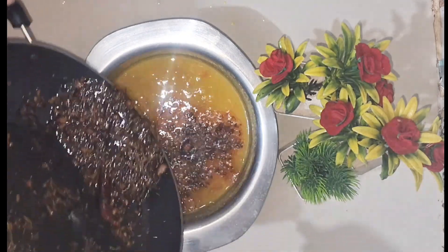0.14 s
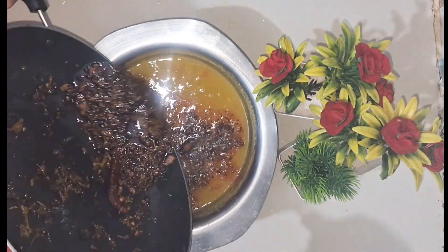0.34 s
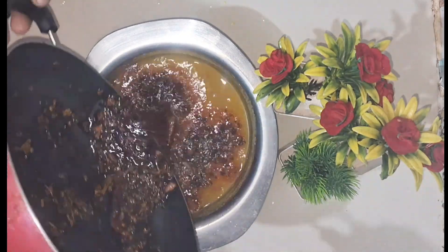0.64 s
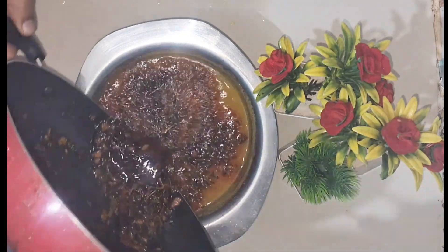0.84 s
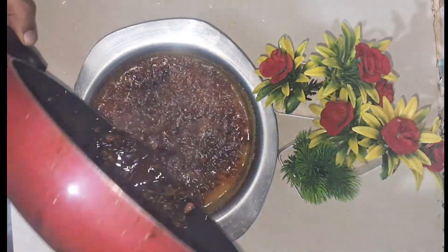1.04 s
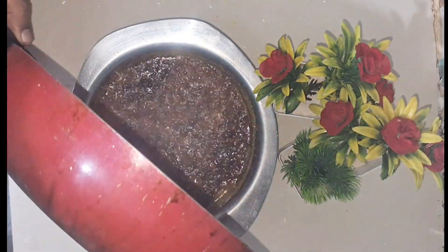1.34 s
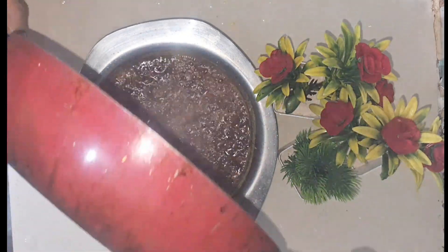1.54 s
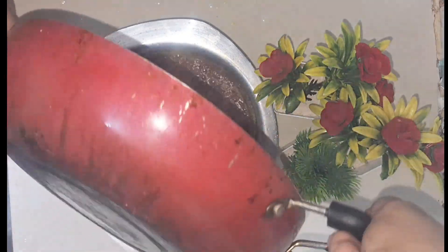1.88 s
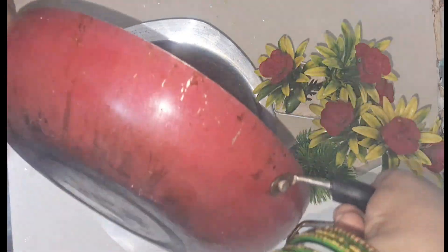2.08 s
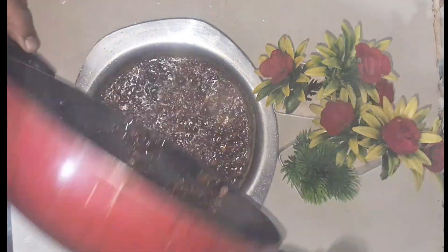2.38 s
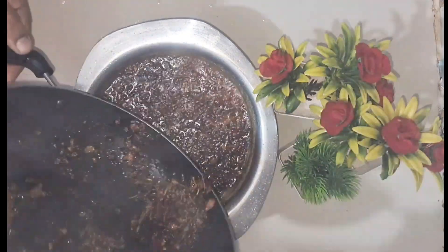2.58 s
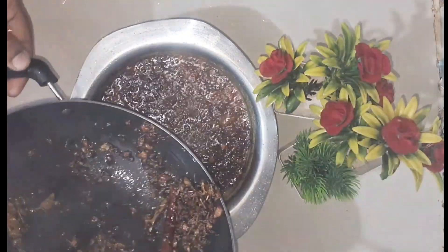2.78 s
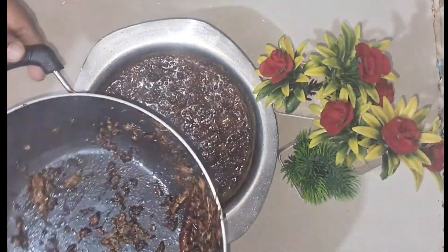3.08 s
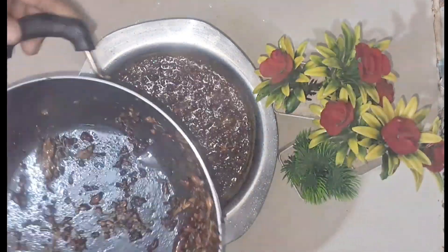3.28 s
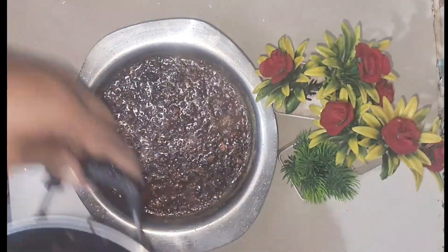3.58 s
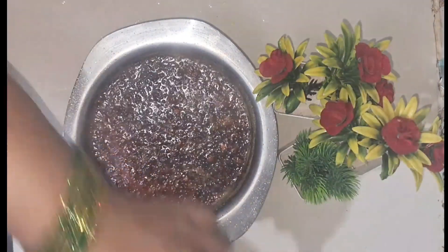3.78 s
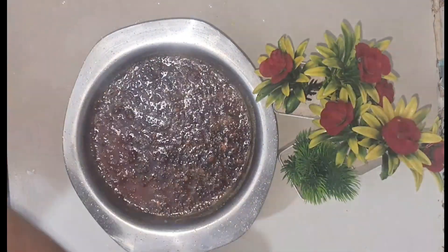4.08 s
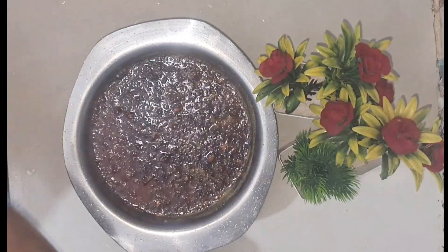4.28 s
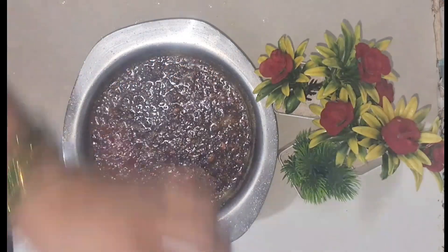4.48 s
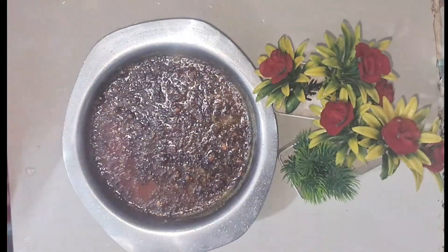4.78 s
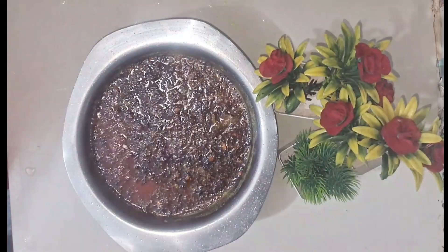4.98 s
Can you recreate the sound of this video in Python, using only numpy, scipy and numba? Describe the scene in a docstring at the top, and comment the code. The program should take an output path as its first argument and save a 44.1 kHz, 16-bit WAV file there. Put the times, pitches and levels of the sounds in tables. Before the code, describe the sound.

Hot spiced oil glugs into a steel bowl of wet lentils, erupting in a loud crackling sizzle that fades, then flares after a bump.

```python
"""Small kitchen: hot spiced oil is tipped from a pan into a steel bowl of cooked lentils; a motor hums over low rumble.
Water flashes to steam: swarms of decaying sines make big bubbles, crackle and fizz, fading as the oil cools.
Glugs, gurgles and slurps are pitched bubbles; spits are short resonant noise bursts.
The pan bumps the bowl; later a hand shifts it on the counter: modes ring, filtered noise scrapes, the sizzle flares."""
import sys
import numpy as np
from scipy import signal
from scipy.fft import rfft, irfft, next_fast_len
from scipy.io import wavfile
from scipy.ndimage import uniform_filter1d
from numba import njit

SR = 44100
rng = np.random.default_rng(int(sys.argv[2]) if len(sys.argv) > 2 else 0)


def int16_out(signal):
    """Quantize to a 16-bit WAV file."""
    q = np.round(np.clip(np.atleast_2d(signal).T, -1, 1) * 32767)
    wavfile.write(sys.argv[1], SR, q.astype(np.int16))


N = 226507
TIME = np.arange(N) / SR
FREQS = np.fft.rfftfreq(2 * next_fast_len(N // 2 + 8192), 1 / SR) + 1e-3  # offset keeps log finite

# Low rumble of the kitchen. Each row: frequency in Hz, relative density in dB per Hz.
RUMBLE_HZ_DB = [(25, -26), (48, -13), (65, -3.5), (88, -9), (130, 6), (160, -5), (190, -1.5), (290, 1),
                (340, -12.5), (410, -3.5), (520, -12.5), (850, -9.5), (1300, -22), (3000, -70)]
# Motor hum. Each row: frequency in Hz, mean level in dB rms.
HUM_HZ_DB = [(64.6, -53.5), (107.7, -51.5), (193.8, -51), (236.9, -54), (279.9, -56.5), (301.5, -58.5)]
# Modes of the bowl on the counter. Each row: frequency in Hz, relative level in dB, undamped t60 in s.
COUNTER_MODES = [(66.1, -14, 1.4), (110, -15, 0.33), (137.4, -5.5, 0.25), (191.7, -3, 0.23),
                 (230, -8.5, 1.24), (276.3, 0, 0.36), (400.3, -1.5, 0.2), (507, -1.5, 0.12)]
# Shudder of the counter after the push. Each row: time in s, level in dB.
SHUDDER_S_DB = [(4.15, -90), (4.27, -34), (4.46, -39), (4.68, -35.5), (4.8, -53), (5.14, -34)]
# Bumps of the bowl. Each row: start in s, thud in dB, contact time in s, ring in dB, ring pitch in Hz,
# scrape in dB, share of ring time that pan or hand leave.
BUMP_EVENTS = [(0.198, -16, 0.0023, -15, 912, -17, 0.55), (0.222, -20, 0.0023, -13, 903, -25, 0.73),
               (4.159, -15.5, 0.0034, -27, 770, -18, 0.79), (4.184, -19, 0.0013, -20, 670, -12, 0.3),
               (4.202, -14, 0.0048, -13.5, 838, -24, 0.33), (4.234, -19, 0.0033, -27, 833, -20, 0.31),
               (4.495, -30, 0.0014, -20, 903, -29, 0.26), (4.502, -19, 0.002, -22.5, 401, -27, 0.44),
               (4.5221, -16, 0.0019, -24.5, 404, -13, 0.34), (4.544, -32, 0.0018, -24, 900, -33, 0.27)]
# Partials of the struck bowl. Each row: multiple of the ring pitch, relative level in dB, undamped t60 in s.
CLANK_PARTIALS = [(0.998, -0.5, 0.37), (1.24, -12, .16), (1.39, -14, .13), (1.84, -5, 0.18)]
# Spits: a pocket of water bursts at once. Each row: start in s, level in dB, centre in Hz,
# width of each of two filter passes in Hz, fade time constant in s.
SPIT_EVENTS = [(0.05, -27.5, 4000, 2500, 0.041), (1.16, -17, 3560, 1800, .035),
               (1.235, -17, 2570, 1400, 0.053), (1.649, -17, 3060, 2200, 0.039),
               (1.72, -17, 3000, 2200, 0.049), (1.89, -19.5, 3970, 2500, 0.037),
               (2.779, -23, 2850, 2400, 0.026), (2.905, -22.5, 4000, 1700, 0.04),
               (3.02, -26.5, 3880, 1600, 0.039), (3.235, -25.5, 2730, 450, 0.037),
               (3.34, -33, 3700, 1300, 0.041), (3.452, -25.5, 3180, 1900, 0.056),
               (4.055, -26.5, 4000, 1800, .022), (4.392, -24, 3570, 3560, 0.042),
               (4.699, -15, 5000, 4500, 0.016), (4.791, -33, 3800, 4540, 0.02),
               (4.878, -24, 8000, 8000, .014), (4.971, -16.5, 5000, 8050, 0.025),
               (5.056, -20, 3050, 3400, 0.049), (5.122, -19.5, 4500, 7000, 0.027)]
# Slurps: quick bubble runs that glide in pitch. Each row: start in s, length in s, level in dB,
# first pitch in Hz, last pitch in Hz, pitch scatter as a share.
SLURP_EVENTS = [(0, 0.081, -26.5, 1610, 2150, 0.073), (.68, .18, -34.5, 1260, 1160, 0.04),
                (.93, 0.2, -31, 1090, 1170, 0.05), (2.06, .075, -28, 1980, 2140, 0.049)]
# Gurgling under the oil stream. Each row: time in s, level in dB, pitch in Hz, pitch scatter as a share.
GURGLE_COURSE = [(0, -31, 1540, 0.045), (.4, -29.5, 1493, .03), (.58, -30, 1487, .035),
                 (.7, -25, 1497, .045), (.85, -34.5, 1544, 0.032), (1.03, -30.5, 1525, .025),
                 (1.3, -37, 1540, .02), (1.6, -29, 1530, 0.0082), (1.75, -41, 1540, .014),
                 (1.86, -36, 1524, 0.01), (1.97, -31, 1522, 0.012), (2.08, -45, 1530, .014),
                 (2.28, -41, 1503, .012), (2.55, -39, 1505, 0.023), (2.8, -62, 1525, .02)]
# Glugs that stand out. Each row: start in s, level in dB, initial pitch in Hz.
GLUG_EVENTS = [(.033, -10.5, 1590), (.232, -13.5, 1490), (.246, -8, 1780), (.271, -8, 2010),
               (.286, -9, 2120), (.356, -17.5, 1480), (.384, -15, 1500), (.411, -15, 1450),
               (.441, -12, 1430), (.568, -10, 1500), (.630, -11, 1490), (.653, -8, 1450), (.681, -10, 1440),
               (.701, -6.5, 1260), (.725, -6, 1200), (.727, -12, 1514), (.742, -6.5, 1520),
               (.750, -14, 1260), (.770, -10, 1270), (.847, -15, 1530), (.897, -17, 1500),
               (.937, -12, 1480), (.977, -9.5, 1525), (1.008, -11, 1560), (1.029, -12.5, 1480),
               (1.048, -11, 1460), (1.068, -12, 1500), (1.135, -17, 1456), (1.165, -19, 1300),
               (1.230, -9.5, 1465), (2.099, -14, 1990)]
# Hot oil meets wet lentils: first spill, stream starts, main pour, bowl shifted. Each row: start in s,
# strength in dB, rise in s, hold in s, reference delay in s (each bubble size takes its own share).
FLARE_EVENTS = [(-0.2, -2, 0.15, 0.22, -0.03), (0.516, -5, 0.23, 0.091, -0.0047),
                (0.608, -0.08, 0.21, 0.96, 0.06), (4.147, -5.5, 0.41, 0.041, -0.036)]
# Answer of each bubble size to a flare. Columns: level in dB, response in dB per dB of strength,
# share of the delay, sag in the hold in dB per s, cooling in dB per s, lasting simmer in dB, unevenness in dB.
BIG_ANSWER = (-19.5, 1.63, 0.3, 5, 8.5, -58, -1.5)
CRACKLE_ANSWER = (-18, 0.55, 1.27, -2, 9, -40.5, 1.5)
FIZZ_ANSWER = (-19, 1.08, 2, 1.4, 8, -31.5, 0.6)
# Colour of the sizzle. Each row: frequency in Hz, relative density in dB per Hz.
SIZZLE_HZ_DB = [(200, -6), (420, -49), (560, -9.5), (800, -7.5), (1150, -1.5), (1500, 1), (2100, 0.5),
                (2800, 4.5), (3800, -2), (5300, -2.5), (7000, -8), (9500, -6), (12700, -6), (15700, -9.5)]
# Air and wall resonances of the bowl. Each row: centre in Hz, width in Hz, lift in dB.
BOWL_RESONANCES = [(832, 9.2, 13.5), (930, 22, -0.5), (1028, 35, 14.5), (1116, 22, 10), (1188, 14, 9),
                   (1223, 11.5, 9.5), (1282, 34, 6), (1506, 31, 5), (1730, 17, 7), (1850, 18, 7.5),
                   (1915, 18, 6.5), (2010, 28, 5.5), (2460, 60, 4.5), (2666, 32, 6), (2930, 29, 4),
                   (3350, 68, 5), (3783, 560, 6)]
# Middle band of the sizzle over time. Each row: time in s, gain in dB.
MIDDLE_S_DB = [(2.1, -4), (2.6, -2.5), (2.95, -5.5), (3.4, -4), (3.7, -3.5), (4.2, 0)]
# Colour after the shift, when the oil boils at a new spot. Each row: frequency in Hz, gain in dB.
SHIFTED_HZ_DB = [(250, 11.5), (420, 7.5), (650, 4.5), (900, -1.5), (1150, -8.5), (1550, 0), (2000, -3.5),
                 (2550, -1.5), (3150, -5), (3800, -2.5), (4800, -1.5), (7000, 1), (15000, 1.5)]
# Difference of the two microphone ports. Each row: frequency in Hz, left minus right in dB.
PORTS_HZ_DB = [(60, 0), (200, -4.5), (380, -3.5), (640, -1), (1290, 4.5), (2400, 0.5), (3800, 0),
               (5200, 1.5), (5900, 0.5), (6700, 2), (8200, 0), (10000, 1), (12000, 3), (15000, 5.5)]
# Delay between the ports. Columns: least in s, spread over the bowl in s.
PORT_DELAY_S = (.00124, .00026)

RUMBLE_DB = -41.5
ROOM_T60_S = 0.18
SPIT_ATTACK_S = 0.004
GURGLE_CYCLES, GURGLE_SURGE_DB = 93, 2.5
GLUG_T60_S, GLUG_ATTACK_S = 0.028, 0.00083
GLUG_SPLASH_DB, GLUG_SPLASH_S = -15, 0.0036
PING_DB, CHURN_DB = -10.5, -21  # against crackle and big bubbles
SHIFT_S, SHIFT_FADE_S = 4.26, 0.082
TOP_HZ = 15800


def undb(db):
    """Decibels to gain."""
    return 10 ** (np.asarray(db) / 20)


def unit(x):
    """Scale to rms 1."""
    return x / np.sqrt(np.mean(x ** 2))


def spectrum(x):
    """Zero-padded spectrum on FREQS."""
    return rfft(x, 2 * (len(FREQS) - 1))


def shape(x, gain):
    """Filter by a gain given on FREQS."""
    return irfft(spectrum(x) * gain)[..., :N]


def colour(points):
    """Gain on FREQS through (Hz, dB) points, linear in dB over log frequency."""
    hz, db = np.transpose(points)
    return undb(np.interp(np.log(FREQS), np.log(hz), db))


def band(lo_hz, hi_hz, order=6):
    """Band-pass gain on FREQS; neighbours add up to even power."""
    return 1 / np.sqrt((1 + (lo_hz / FREQS) ** (2 * order)) * (1 + (FREQS / hi_hz) ** (2 * order)))


def walk(rate_hz):
    """Random levels held 1 / rate_hz seconds and slewed twice."""
    k = int(SR / rate_hz)
    held = rng.standard_normal(N)[np.arange(N) // k]
    return 0.41 * uniform_filter1d(uniform_filter1d(held, k), k)


def ring(t, hz, t60_s):
    """A struck mode: sine with exponential decay."""
    return np.sin(2 * np.pi * hz * t) * np.exp(-np.log(1000) * t / t60_s)


def add(out, s, x):
    """Mix x into out from time s."""
    i = max(int(s * SR), 0)
    out[i:i + len(x)] += x[:max(N - i, 0)]


@njit
def pops(start, hz, cycles, size):
    """Each bursting bubble is a sine that falls 60 dB over its cycles; start is in samples."""
    out = np.zeros(N)
    for k in range(len(start)):
        length = cycles[k] * SR / hz[k]
        z = size[k] + 0j
        p = np.exp(2j * np.pi * hz[k] / SR - np.log(1000) / length)
        for i in range(int(start[k]), min(N, int(start[k] + length) + 2)):
            out[i] += z.imag
            z *= p
    return out


def kitchen(x, wet_db, early_s=0.017):
    """Echoes from bowl, counter and walls: a diffuse wash with the sound's colour that trails its energy."""
    t = TIME[:SR // 3]
    decay = np.exp(-2 * np.log(1000) * t / ROOM_T60_S) + 8 * np.exp(-t / early_s)
    energy = signal.fftconvolve(np.mean(x ** 2, axis=0), decay / decay.sum())[:N]
    random_phase = np.exp(2j * np.pi * rng.random((2, len(FREQS))))
    wash = unit(irfft(np.abs(spectrum(x)) * random_phase)[:, :N])
    return (x + undb(wet_db) * wash * np.sqrt(np.abs(energy))) / np.sqrt(1 + undb(wet_db) ** 2)


def reflections(x, wet_db, lag_s, t60_s):
    """A sound from one spot reaches the left port first; a short train of echoes reaches each port."""
    t = TIME[:SR // 6]
    echo = rng.standard_normal((2, len(t))) * np.exp(-np.log(1000) * t / t60_s) * (t > .002)
    response = undb(wet_db) * unit(echo) / np.sqrt(len(t))
    response[0, 0] += 1
    response[1, int(lag_s * SR)] += 1
    return signal.fftconvolve(x[None], response, axes=1)[:, :N] / np.sqrt(1 + undb(wet_db) ** 2)


def background():
    """A motor's sines waver in level and phase over noise rumble, most alike at both ports near 200 Hz."""
    hum = np.zeros(N)
    for hz, db in HUM_HZ_DB:
        phase = 2 * np.pi * hz * TIME + 3.8 * walk(5.5)
        hum += undb(db + 2 * walk(14.0)) * np.sqrt(2) * np.sin(phase)
    mid, side = shape(rng.standard_normal((2, N)), colour(RUMBLE_HZ_DB))
    side = shape(side, colour([(50, -1), (200, -14.0), (400, -1.0)]))
    return hum + undb(RUMBLE_DB) * unit(mid + side * np.array([[1], [-1]]))


def shudder():
    """Irregular small pushes keep the counter's modes rumbling: noise through its resonances."""
    body = sum(undb(db) / np.hypot(1, (FREQS - hz) / 11) ** 2 for hz, db, _ in COUNTER_MODES)
    rumble = unit(shape(rng.standard_normal(N), body * band(85, 276, order=3)))
    return rumble * undb(np.interp(TIME, *np.transpose(SHUDDER_S_DB)))


def bumps():
    """Each bump thuds through the counter, rings the full bowl and grates its base a little."""
    thuds, rings, grating = np.zeros((3, N))
    t = TIME[:SR]
    for s, thud_db, contact_s, ring_db, ring_hz, scrape_db, free in BUMP_EVENTS:
        body = np.zeros(len(t))
        for k, (hz, db, t60_s) in enumerate(COUNTER_MODES):
            body += (-1) ** k * undb(db) * ring(t, hz, t60_s * free)
        body = body * (1 - np.exp(-t / 0.012))  # the heavy counter takes a moment to swing
        push = np.sin(np.pi * np.minimum(t[:SR // 50] / contact_s, 1)) ** 2  # longer push, duller thud
        add(thuds, s, undb(thud_db) * signal.fftconvolve(body, push / push.sum())[:len(t)])
        clank = sum(undb(db) * ring(t, ring_hz * multiple, t60_s * free)
                    for multiple, db, t60_s in CLANK_PARTIALS)
        add(rings, s, undb(ring_db) * clank * (1 - np.exp(-t / 0.0067)))
        add(grating, s, undb(scrape_db) * np.exp(-t / 0.012) * (1 - np.exp(-t / 0.016)))
    thuds = signal.sosfilt(signal.butter(3, 48, "high", fs=SR, output="sos"), thuds)
    scrape = unit(shape(rng.standard_normal((2, N)), band(110, 1080, order=4)))
    return thuds + reflections(rings, wet_db=-25, lag_s=0.00028, t60_s=0.18) + grating * scrape


def spits():
    """A volley of like-sized bursts, made of uneven noise through a resonance, swells and fades quickly."""
    out, t = np.zeros((2, N)), TIME[:SR // 5]
    for s, db, hz, width_hz, fade_s in SPIT_EVENTS:
        swell = (1 - np.exp(-t / SPIT_ATTACK_S)) * np.exp(-t / fade_s)
        resonance = signal.iirpeak(min(hz, SR / 3), max(hz / width_hz, .5), fs=SR)
        clicks = rng.standard_normal((2, len(t))) * undb(1.2 * rng.standard_normal(len(t)))
        volleys = unit(signal.lfilter(*resonance, signal.lfilter(*resonance, clicks)))
        for port, volley in zip(out, volleys):
            add(port, s, undb(db) * volley * swell)
    return out


def slurps(count=48):
    """Oil slides off the pan in a run of bubbles; the pitch climbs as they shrink and falls as they grow."""
    out = np.zeros(N)
    for s, length_s, db, first_hz, last_hz, scatter in SLURP_EVENTS:
        along = (np.arange(count) + rng.random(count)) / count
        hz = (first_hz + (last_hz - first_hz) * along) * np.exp(scatter * rng.standard_normal(count))
        start = (max(s, 0) + along * length_s) * SR
        run = pops(start, hz, hz * GLUG_T60_S / 2, np.sqrt(np.sin(np.pi * along)))
        out += undb(db) * run / np.sqrt(np.sum(run ** 2) / (length_s * SR))
    return out


def gurgle(count):
    """A dense run of like-sized bubbles blends into one surging band; less pitch scatter makes it a thin note."""
    times, db, hz, scatter = np.transpose(GURGLE_COURSE)
    s = (np.arange(count) + rng.random(count)) / count * TIME[-1]
    pitch = np.interp(s, times, hz) * np.exp(np.interp(s, times, scatter) * rng.standard_normal(count))
    run = pops(s * SR, pitch, np.full(count, float(GURGLE_CYCLES)), rng.choice([-1., 1.], count))
    return unit(run) * undb(np.interp(TIME, times, db) + GURGLE_SURGE_DB * walk(45.4))


def glugs():
    """Large bubbles break with a wet splash and ring briefly, rising in pitch; slurps and gurgle join."""
    out, t = slurps() + gurgle(count=2400), TIME[:SR // 16]
    splash = unit(shape(rng.standard_normal(N), band(1100, 3200, order=3)))
    for k, (s, db, hz) in enumerate(GLUG_EVENTS):
        tone = ring(t * (1 + t), hz, GLUG_T60_S) * (1 - np.exp(-t / GLUG_ATTACK_S))
        noise = splash[k * len(t):(k + 1) * len(t)]
        burst = undb(GLUG_SPLASH_DB) * noise * np.exp(-t / GLUG_SPLASH_S)
        add(out, s, undb(db) * (tone + burst))
    return reflections(out, wet_db=-4, lag_s=.00135, t60_s=.11)


def boiling(level_db, response, delay_share, sag_db_per_s, cooling_db_per_s, simmer_db, uneven_db):
    """Gain of one bubble size: each flare rises, holds and dies as the oil cools; a weak boil surges more."""
    power = undb(simmer_db) ** 2
    for s, strength_db, rise_s, hold_s, delay_s in FLARE_EVENTS:
        t = TIME - s - delay_share * delay_s
        age = np.maximum(t - rise_s, 0)
        fade_db = sag_db_per_s * np.minimum(age, hold_s) + cooling_db_per_s * np.maximum(age - hold_s, 0)
        flare = np.clip(t / rise_s, 0, 1) * undb(level_db + response * strength_db - fade_db)
        power = power + flare ** 2
    return np.sqrt(power) * undb(uneven_db * (1 - .7 * power / power.max()) * walk(14))


def swarm(activity, lo_hz, hi_hz, cycles, spread_db, flurry_db, count):
    """Bubbles of one size class all over the surface, rms 1; low activity (0-1) thins them to ticks."""
    when, keep, pitch, life, strength, sign, place = rng.random((count, 7)).T
    alive = keep < np.interp(when * N, np.arange(N), activity)
    hz = np.minimum(lo_hz + (hi_hz - lo_hz) * pitch, SR * .45)
    size = undb(-spread_db * np.log(1 - .998 * strength)) * np.sign(sign - .5)
    size = size * hz / hi_hz  # short rings burst harder, so the spectrum stays even
    least_s, spread_s = PORT_DELAY_S
    lag = (least_s + spread_s * place) * SR  # the far port hears each bubble a little later
    lives = cycles * (.5 + life)
    ports = np.array([pops((when * N + d)[alive], hz[alive], lives[alive], size[alive])
                      for d in (0, lag)])
    return unit(ports * undb(flurry_db * walk(55)) / np.sqrt(activity))


def sizzle():
    """Three sizes of steam bubble burst through the oil in uneven flurries and are coloured by the bowl."""
    big_gain, crackle_gain, fizz_gain = boiling(*BIG_ANSWER), boiling(*CRACKLE_ANSWER), boiling(*FIZZ_ANSWER)
    activity = np.clip((crackle_gain / crackle_gain.max()) ** .7, .02, 1)
    lift_db = sum(db / (1 + (2 * (FREQS - hz) / width_hz) ** 2) for hz, width_hz, db in BOWL_RESONANCES)
    bowl = colour(SIZZLE_HZ_DB) * undb(lift_db)

    big = swarm(activity, 399, 2626, cycles=20.7, spread_db=2.2, flurry_db=1.5, count=6500)
    crackle = swarm(activity, 1680, 7370, cycles=14.3, spread_db=3.0, flurry_db=3.0, count=22000)
    fizz = swarm(activity, 4360, 19600, cycles=4.2, spread_db=2.5, flurry_db=2.4, count=80000)
    big = unit(shape(kitchen(big, wet_db=-1.5), bowl * band(450, 2000)))
    crackle = unit(shape(kitchen(crackle, wet_db=5), bowl * band(2000, 6000)))
    fizz = unit(shape(kitchen(fizz, wet_db=0.5), bowl * band(6000, 16500)))

    # some bubbles keep their shape and ring on within the crackle
    pings = swarm(activity, 2006, 4568, cycles=130, spread_db=1, flurry_db=-4, count=1100)
    crackle = unit(crackle + undb(PING_DB) * kitchen(pings, wet_db=-2))
    # cooler oil makes smaller bubbles, so the crackle brightens as it thins
    crackle = unit(crackle + 0.77 * (1 - activity) * shape(crackle, band(4500, 5500)))
    # steam churning under the surface rumbles in step with the big bubbles
    churn = unit(shape(rng.standard_normal((2, N)), band(234, 430, order=5)))
    return (big + undb(CHURN_DB) * churn) * big_gain + crackle * crackle_gain + fizz * fizz_gain


def scene():
    """All sources through the two ports; the sizzle's middle band varies and its colour changes at the shift."""
    frying = sizzle()
    middle_gain = undb(np.interp(TIME, *np.transpose(MIDDLE_S_DB)))
    frying = frying + (middle_gain - 1) * shape(frying, band(920, 3670))
    moved = np.clip((TIME - SHIFT_S) / SHIFT_FADE_S + .5, 0, 1)
    frying = (1 - moved) * frying + moved * shape(frying, colour(SHIFTED_HZ_DB))
    dry = background() + shudder() + bumps() + spits() + glugs() + frying
    return shape(dry, colour(PORTS_HZ_DB) ** np.array([[.5], [-.5]]))  # half the difference each way


def record(dry):
    """Steep elliptic low-pass at TOP_HZ."""
    return signal.sosfilt(signal.ellip(12, .1, 80, TOP_HZ, fs=SR, output="sos"), dry)


dry = scene()
out = record(dry)
int16_out(out)
```